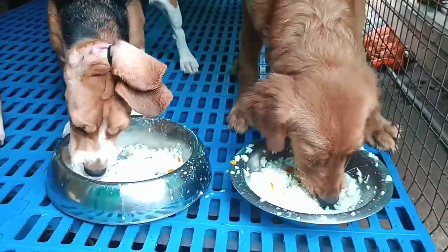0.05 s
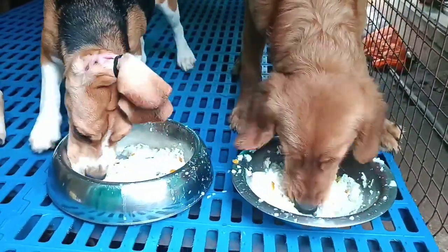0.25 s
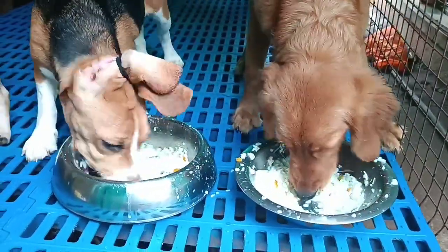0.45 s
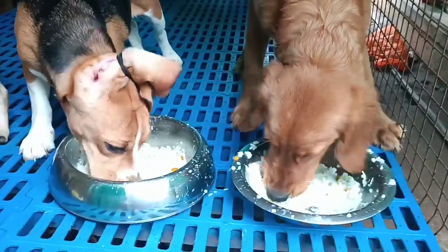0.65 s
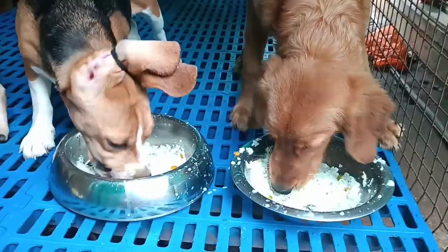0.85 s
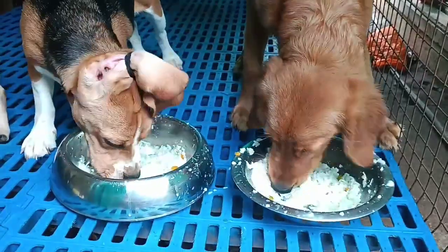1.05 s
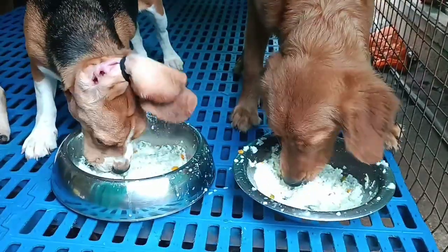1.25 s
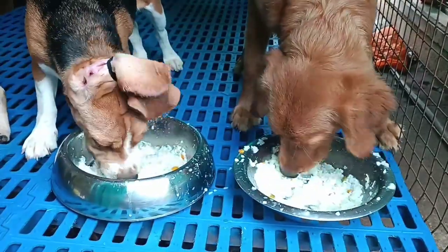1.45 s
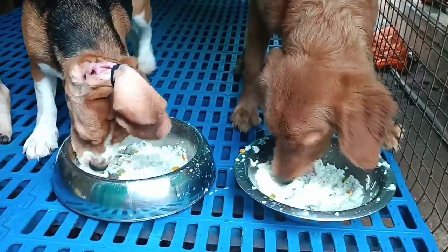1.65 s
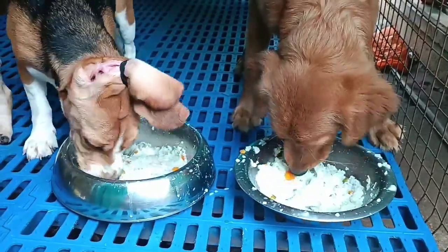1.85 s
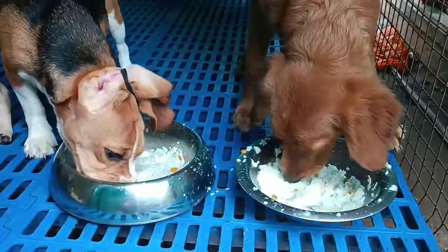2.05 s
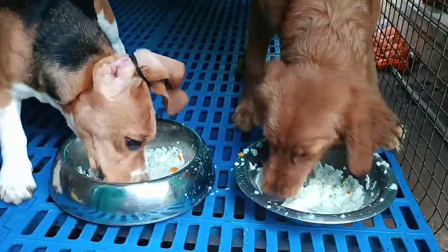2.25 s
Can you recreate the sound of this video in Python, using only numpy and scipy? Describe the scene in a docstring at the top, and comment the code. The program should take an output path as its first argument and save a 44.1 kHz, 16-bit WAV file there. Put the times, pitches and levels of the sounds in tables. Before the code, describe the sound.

Two dogs eat soft wet food from steel bowls, with irregular squelches, smacks and bright lip pops, a few teeth ticks on metal and soft bowl bumps; close stereo pickup in a small, short, bright room.

```python
"""Two dogs eating wet food.

Steel bowls stand on a plastic kennel floor. Bites are runs of wet clicks through throat, mouth and lip resonances.
Lips, tongue and air pockets pop as short swelling sines. Teeth tick on steel, bowls bump and paws thud as
decaying modes, and a thin squeak falls. Shaped noise gives a short, bright room and a faint background.
"""
import sys
import numpy as np
from scipy import signal
from scipy.fft import rfft, irfft
from scipy.io import wavfile

SR = 44100
rng = np.random.default_rng(int(sys.argv[2]) if len(sys.argv) > 2 else 0)


def wav_out(sig):
    """Save sig, one row per channel (or a flat mono array), as 16-bit PCM at SR to the path in sys.argv[1]."""
    wavfile.write(sys.argv[1], SR, np.round(np.clip(np.atleast_2d(sig).T, -1, 1) * 32767).astype(np.int16))


N = 101429
T = np.arange(N) / SR

# background noise spectrum: pitch_hz, relative level_db per Hz
BACKGROUND_SPECTRUM = [(30, -20), (70, -2), (190, 5), (400, -4), (800, -1.5), (1500, -5), (4400, -6),
                       (8000, -25.5), (13500, -27), (15000, -16.5)]
# left-right likeness of noise: pitch_hz, likeness (1 = same, 0 = independent)
NOISE_LIKENESS = [(50, 0.69), (400, 0.8), (1000, 0.24), (6000, 0)]
# room response spectrum: pitch_hz, level_db
ROOM_SPECTRUM = [(150, -11.5), (500, -6.5), (1200, -5), (4000, 0.5), (7000, -1), (15000, -13.5)]
# bowls bump the floor: start_s, level_db
BOWL_BUMPS = [(.323, -36.5), (.375, -39), (1.0, -44), (1.38, -40), (.49, -44), (2.13, -42.5),
              (2.182, -41.5)]
# floor modes under the bowls: pitch_hz, level_db, t60_s
BUMP_MODES = [(125, -16, 0.4), (171, -2, 0.064), (229, 3.5, 0.046), (304, -7, 0.05), (304, -3, 0.19)]
# paws thud softly on the floor: start_s, level_db
PAW_STEPS = [(.735, -50.5), (.9, -50.5), (2.19, -50)]
# floor modes under the paws: pitch_hz, level_db, t60_s
PAW_MODES = [(59.6, -10, 0.92), (101, -3, 0.34)]
# teeth tick on the steel: start_s, level_db
TEETH_TICKS = [(.3125, -20.5), (.644, -33), (.9792, -20), (1.2705, -41), (2.1226, -17.5)]
# steel modes: pitch_hz, level_db, t60_s
STEEL_MODES = [(5780, 2.5, 0.0025), (8200, -16.5, 0.029), (9100, -4, 0.014), (10520, -2, 0.0033),
               (15660, -2, 0.0046)]
# thin falling squeak: start_s, length_s, from_hz, to_hz, level_db
FALLING_SQUEAK = (.48, .065, 7100, 6550, -55)
# stretches of the left dog, the right one in between: from_s, to_s
LEFT_DOG_TURNS_S = [(0, .275), (.54, .6), (.93, .995), (1.25, 1.37), (1.55, 1.8), (2.03, 2.1), (2.17, 2.3)]
# pan of mouth sounds: pitch_hz, left_minus_right_db
MOUTH_PAN = [(500, 2), (900, 0), (1300, -3), (2000, -6), (2700, -2), (4200, -10), (6000, -7)]
# pops of lips, tongue and air pockets: start_s, pitch_hz, level_db, swell_s
MOUTH_POPS = [(.232, 1820, -19.5, 0.0034), (0.2813, 2800, -15, 0.00027), (0.2814, 4060, -9.5, 0.00055),
              (0.2859, 3710, -11.5, 0.00043), (0.288, 1042, -16.5, 0.0077), (0.297, 1180, -22.5, 0.0015),
              (.3205, 710, -9, 0.0015), (.329, 643, -19, 0.0017), (0.549, 4810, -21.5, 0.0016),
              (0.5489, 1813, -26, 0.0042), (0.564, 1153, -19, 0.0048), (0.6407, 3606, -3.5, 0.00071),
              (0.6562, 1163, -23.5, 0.0029), (0.137, 4540, -25.5, 0.00068), (0.576, 4800, -27.5, .001),
              (0.7195, 4460, -43, 0.0022), (.7436, 2670, -43, 0.0019), (0.772, 4180, -31.5, 0.00039),
              (.792, 1020, -49, 0.0063), (.9895, 4300, -17.5, 0.0011), (1.1926, 1655, -24.5, .0009),
              (1.2, 1690, -24.5, 0.00087), (1.269, 4250, -26.5, 0.0021), (1.278, 3950, -8, 0.00038),
              (1.289, 2040, -17.5, 0.0015), (1.315, 4040, -12, 0.00085), (1.3775, 612, -15.5, 0.0067),
              (1.379, 836, -23, 0.01), (1.392, 567, -28.5, 0.012), (1.56, 1630, -19.5, 0.0013),
              (1.575, 4240, -14, 0.0012), (1.5906, 1932, -14, 0.0023), (1.597, 4100, -13.5, 0.00096),
              (1.616, 4740, -18.5, 0.0021), (1.817, 4360, -18.5, 0.0013), (1.819, 2955, -16.5, 0.0026),
              (1.8223, 3200, -13, 0.00041), (1.8913, 4630, -26, 0.0026), (1.925, 1816, -32, 0.0048),
              (1.875, 3500, -37, 0.00073), (1.907, 3100, -29, 0.0013), (1.956, 3120, -42, 0.019),
              (1.969, 519.6, -30.5, 0.0096), (2.032, 4526, -37.5, 0.013), (2.05, 651, -28, 0.0033),
              (2.13, 784, -36.5, 0.016)]
# squelching bites: start_s, length_s, throat_hz, throat_db, mouth_hz, mouth_db, lips_hz, lips_db
SQUELCHES = [(0.0, 0.023, 710, -89, 1410, -43, 4100, -34.5),
             (0.039, 0.026, 683, -54.5, 1254, -43.5, 4000, -43.5),
             (0.221, 0.026, 734, -44, 1640, -32, 4110, -37.5),
             (0.243, 0.089, 641, -34, 1166, -36.5, 3930, -42),
             (0.282, 0.0079, 950, -35, 1470, -18.5, 3770, -24),
             (0.317, 0.012, 738, -19.5, 1445, -21.5, 3270, -25.5),
             (0.335, 0.0264, 522, -29.5, 925, -25.5, 3200, -34),
             (0.362, 0.0398, 765, -36, 1480, -35.5, 3580, -37.5),
             (0.537, 0.031, 1080, -70, 1920, -40.5, 3940, -38.5),
             (0.557, 0.022, 980, -48, 1290, -40, 2700, -33),
             (0.647, 0.026, 1140, -48, 1257, -41, 3540, -33.5),
             (0.783, 0.018, 950, -41, 1137, -42.5, 4350, -81),
             (0.933, 0.05, 1000, -74, 1710, -35.5, 3930, -37.5),
             (0.971, 0.032, 709, -35, 1886, -33, 4160, -34.5),
             (1.001, 0.047, 642, -38, 1840, -44.5, 4300, -42.5),
             (1.057, 0.026, 568, -43, 1383, -37.5, 4200, -44.5),
             (1.095, 0.009, 737, -46.5, 1680, -34.5, 4500, -42),
             (1.134, 0.022, 581, -42.5, 990, -46.5, 2670, -61),
             (1.184, 0.021, 990, -56, 1680, -48, 4180, -39.5),
             (1.275, 0.019, 730, -42.5, 2060, -32, 3990, -30.5),
             (1.305, 0.022, 850, -31.5, 1550, -29, 3620, -26),
             (1.343, 0.045, 760, -73, 1466, -38.5, 4200, -46.5),
             (1.368, 0.051, 630, -36.5, 1375, -29, 4490, -44.5),
             (1.437, 0.069, 936, -47, 2040, -42, 3540, -39),
             (1.485, 0.08, 1100, -78, 1384, -38, 4240, -39.5),
             (1.552, 0.05, 830, -77, 1705, -31, 4400, -33), (1.585, 0.047, 1120, -38, 2020, -32, 4530, -34),
             (1.626, 0.062, 705, -49.5, 1770, -37.5, 4180, -38.5),
             (1.725, 0.045, 520, -50.5, 1420, -44, 3300, -49.5),
             (1.812, 0.0099, 1080, -54, 2300, -34, 3500, -30.5),
             (1.892, 0.026, 800, -82, 1730, -44, 4040, -41),
             (1.929, 0.036, 568, -43.5, 1800, -72, 2920, -48),
             (1.966, 0.0445, 730, -43, 1174, -53, 3250, -58),
             (2.039, 0.022, 625, -41.5, 1250, -32.5, 4040, -45.5),
             (2.114, 0.023, 810, -57, 1530, -68, 3610, -38),
             (2.173, 0.018, 783, -46.5, 1910, -40.5, 4940, -30.5),
             (2.219, 0.31, 656, -61, 1660, -53, 3460, -49.5)]
# resonance spread as a share of its centre: throat, mouth, lips
SPREAD_SHARES = (0.16, 0.26, 0.25)

BACKGROUND_DB, CUTOFF_HZ = -51.5, 16900
ROOM_T60_S, ROOM_ONSET_S = 0.1, 0.0011
TICK_PAN_DB, TICK_DIRECT_GAIN, TICK_ROOM_DB = 13.5, 0.5, -4
# arrival on the left ahead of the right; negative = later
LEFT_DOG_LEAD_S, RIGHT_DOG_LEAD_S = 0.000165, -0.000028
# high pops beam forward and stir the room less
POP_ROOM_DB, POP_ROOM_HZ, POP_BRIGHT_ROOM_DB = 3, 1850, -3.5
SWELL_POWER, MIN_SWELL_CYCLES = 2.7, 2.4  # a pocket needs a few cycles to build up
POP_RISE_SHARE, WAVER_SHARE, WAVER_S = 0.023, 0.025, 0.004
MOUTH_DIRECT_DB = -2.5  # muzzles down in the bowls: much of the chewing arrives reflected
CLICKS_PER_S, CLICK_SPREAD_DB, FILM_SHARE = 600, 4, 0.035
ATTACK_S, RELEASE_S, SAG_DB = 0.0035, 0.003, 2.5
CLUMP_DB, CLUMP_S = 4.5, 0.005  # food sticks and lets go
POCKET_OFFSETS = (-1.206, -0.42, 0.07, 0.467, 1)  # log-pitch offsets, in spread shares
POCKET_WIDTH_SHARE, GLIDE_SHARE = 0.074, 0.0503  # of the resonance centre; of the pitch over a bite
SKIRT_DB = -14  # wider, less resonant part of each click
SPRAY_DB, TREBLE_HZ = -29.5, 5930  # fine spatter; low-pass of the resonances


def from_db(db):
    """Decibels to gain."""
    return 10 ** (np.asarray(db) / 20)


def at_hz(points, hz):
    """Read a table on a log-frequency axis."""
    table_hz, values = np.transpose(points)
    return np.interp(np.log(np.maximum(hz, 1)), np.log(table_hz), values)


def add(out, start_s, x):
    """Mix a sound in at its time."""
    i = max(int(start_s * SR), 0)
    out[..., i:i + x.shape[-1]] += x[..., :N - i]


def panned(x, pan_db):
    """Mono to stereo at equal power."""
    gains = from_db(np.array([[pan_db], [-pan_db]]) / 2)
    return x * gains / np.sqrt(np.mean(gains ** 2))


def low_passed(x, order, cutoff_hz):
    """Butterworth low-pass."""
    return signal.sosfilt(signal.butter(order, cutoff_hz, fs=SR, output="sos"), x)


def resonate(x, hz, width_hz):
    """Two-pole resonance, gain near 1 on top."""
    r = np.exp(-np.pi * width_hz / SR)
    zeros = np.array([1, 0, -1]) * (1 - r * r) / 2
    poles = [1, -2 * r * np.cos(2 * np.pi * hz / SR), r * r]
    return signal.lfilter(zeros, poles, x + 1e-18)


def wander(t, step_s):
    """Random values at every step, joined by straight lines."""
    knots_s = np.arange(0, t[-1], step_s)
    values = np.clip(rng.standard_normal(len(knots_s)), -2, 1)
    return np.interp(t, knots_s, values)


def stereo_noise(spectrum):
    """Coloured noise, mid and side mixed so the sides are alike mainly in the bass."""
    hz = np.fft.rfftfreq(N, 1 / SR)
    mid, side = rfft(rng.standard_normal((2, N)))
    alike = np.clip(at_hz(NOISE_LIKENESS, hz), -1, 1)
    common = np.sqrt((1 + alike) / 2) * mid
    opposed = np.sqrt((1 - alike) / 2) * side * np.array([[1], [-1]])
    return irfft(from_db(at_hz(spectrum, hz)) * (common + opposed), N)


def struck(hits, modes):
    """Each hit rings decaying sine modes, each with a random strength."""
    out, t = np.zeros(N), T[:SR // 4]
    for start_s, hit_db in hits:
        for k, (hz, mode_db, t60_s) in enumerate(modes):
            level_db = hit_db + mode_db + rng.normal(0, 2) - 60 * t / t60_s
            add(out, start_s, (-1) ** k * from_db(level_db) * np.sin(2 * np.pi * hz * t))
    return out


def from_dog(x, start_s, hz):
    """Place a mouth sound by pan and arrival time at the dog whose turn it is."""
    is_left = any(a - .003 <= start_s < b for a, b in LEFT_DOG_TURNS_S)
    lead_s = LEFT_DOG_LEAD_S if is_left else RIGHT_DOG_LEAD_S
    left, right = panned(x, at_hz(MOUTH_PAN, hz))
    t = T[:len(x)]
    return np.array([np.interp(t + lead_s, t, left), right])


def background():
    """Steady noise with a shaped spectrum."""
    noise = stereo_noise(BACKGROUND_SPECTRUM)
    return from_db(BACKGROUND_DB) * noise / noise.std()


def room(x):
    """Diffuse reflections from bowls, floor and walls: convolution with decaying noise."""
    t = T[:SR // 2]
    onset = 1 - np.exp(-(t / ROOM_ONSET_S) ** 2)
    decay = from_db(-60 * t / ROOM_T60_S) * onset
    response = stereo_noise(ROOM_SPECTRUM)[:, :len(t)] * decay / np.sqrt(np.sum(decay ** 2))
    return signal.fftconvolve(x, response, axes=1)[:, :N]


def floor_knocks():
    """Bowl bumps and paw thuds ring low floor modes."""
    return struck(BOWL_BUMPS, BUMP_MODES) + struck(PAW_STEPS, PAW_MODES)


def teeth_ticks():
    """Teeth strike the steel and ring its high modes, panned left."""
    return panned(struck(TEETH_TICKS, STEEL_MODES), TICK_PAN_DB)


def squeak():
    """A faint sine slides down under a half-sine envelope."""
    start_s, length_s, from_hz, to_hz, level_db = FALLING_SQUEAK
    along = np.clip((T - start_s) / length_s, 0, 1)
    pitch_hz = from_hz + (to_hz - from_hz) * along
    return from_db(level_db) * np.sin(np.pi * along) * np.sin(2 * np.pi * np.cumsum(pitch_hz) / SR)


def pops():
    """An air pocket opens: its note swells, quivers with the wet walls, rises a little and dies."""
    out, t = np.zeros((2, N)), T[:SR // 8]
    for start_s, hz, level_db, swell_s in MOUTH_POPS:
        age = t / max(swell_s, MIN_SWELL_CYCLES / hz)
        rise = POP_RISE_SHARE * np.tanh(age / 2 - 1)
        pitch_hz = hz * (1 + rise + WAVER_SHARE * wander(t, WAVER_S))
        swell = (age * np.exp(1 - age)) ** SWELL_POWER
        note = swell * np.sin(2 * np.pi * np.cumsum(pitch_hz) / SR)
        add(out, start_s, from_dog(from_db(level_db) * note, start_s, hz))
    return out


def bites():
    """Wet films tear in clicks; each rings one of five drifting air pockets in each of three resonances."""
    out, spray, t = np.zeros((2, N)), np.zeros(N), T[:SR // 6]
    for start_s, length_s, *shape in SQUELCHES:
        along = np.minimum(t / length_s, 1)
        attack = np.minimum(t / ATTACK_S, 1)
        release = np.exp(-np.maximum(t - length_s, 0) / RELEASE_S)
        effort = attack * release * from_db(-SAG_DB * along + CLUMP_DB * wander(t, CLUMP_S))
        tear_db = CLICK_SPREAD_DB * np.minimum(rng.exponential(1, len(t)), 3)
        tears = from_db(tear_db) * (rng.random(len(t)) < CLICKS_PER_S / SR)
        scale = length_s * SR
        for hz, level_db, share in zip(shape[::2], shape[1::2], SPREAD_SHARES):
            ring, dealt = 0, rng.integers(0, len(POCKET_OFFSETS), len(t))
            for k, offset in enumerate(POCKET_OFFSETS):
                signed_tears = tears * (dealt == k) * rng.choice([-1, 1], len(t))
                clicks = effort * (signed_tears + FILM_SHARE * rng.standard_normal(len(t)))
                wide = resonate(clicks, hz, 2 * share * hz)
                narrow = resonate(wide, hz * np.exp(share * offset), POCKET_WIDTH_SHARE * hz)
                pocket = narrow + from_db(SKIRT_DB) * wide
                # a warped time axis glides the pitch
                drift = 1 + GLIDE_SHARE * rng.normal() * (along - .5)
                ring = ring + np.interp(np.cumsum(drift) / SR, t, pocket)
            ring = ring * from_db(level_db) / np.sqrt(np.sum(ring ** 2) / scale)
            add(out, start_s, from_dog(ring, start_s, hz))
        # spatter: the last lip pocket's raw clicks, set from the lip level
        spatter = clicks * from_db(level_db + SPRAY_DB) / np.sqrt(np.sum(clicks ** 2) / scale)
        add(spray, start_s, spatter)
    return low_passed(out, 3, TREBLE_HZ) + np.diff(spray, prepend=0)


def scene():
    """Mouths, teeth, bowls and paws in the room, over the background."""
    chewing, popping = bites() + squeak(), pops()
    ticks, knocks = teeth_ticks(), floor_knocks()
    backdrop = background()
    dull_pops = low_passed(popping, 2, POP_ROOM_HZ)
    room_pops = from_db(POP_ROOM_DB) * dull_pops + from_db(POP_BRIGHT_ROOM_DB) * popping
    to_room = chewing + room_pops + knocks + from_db(TICK_ROOM_DB) * ticks
    direct = from_db(MOUTH_DIRECT_DB) * chewing + popping + TICK_DIRECT_GAIN * ticks + knocks
    return direct + room(to_room) + backdrop


def record(dry):
    """Cut the top with a steep low-pass."""
    return signal.sosfilt(signal.cheby2(12, 70, CUTOFF_HZ, fs=SR, output="sos"), dry)


dry = scene()
out = record(dry)
wav_out(out)
```